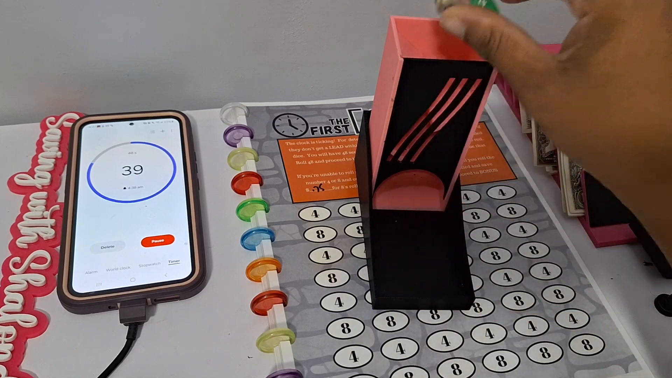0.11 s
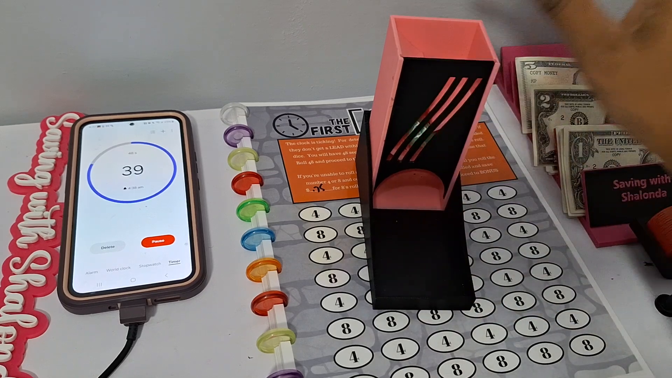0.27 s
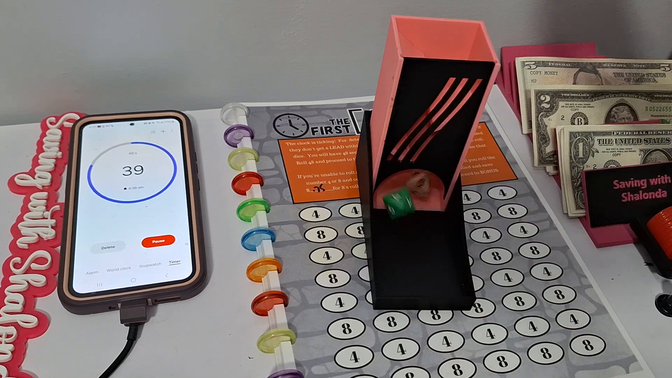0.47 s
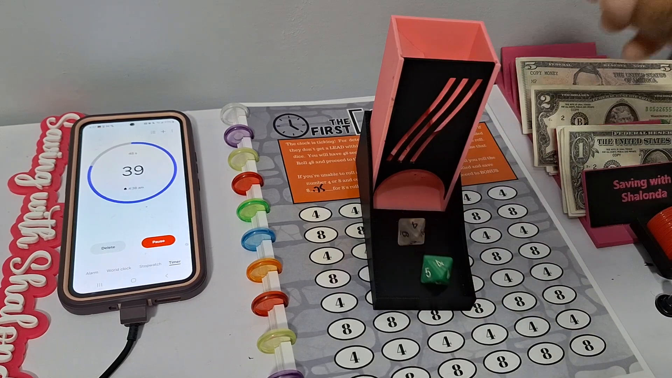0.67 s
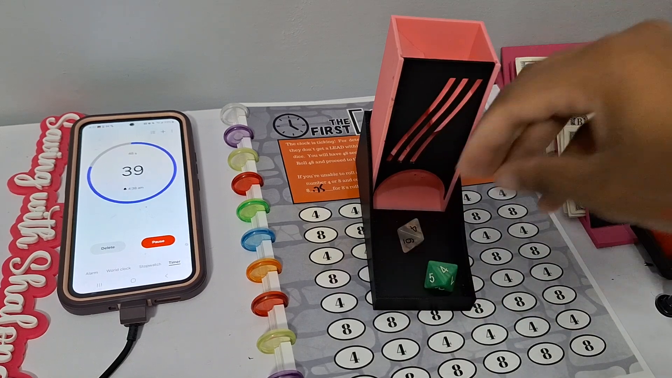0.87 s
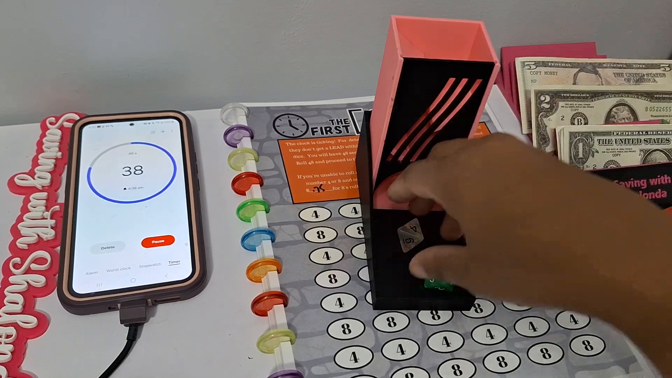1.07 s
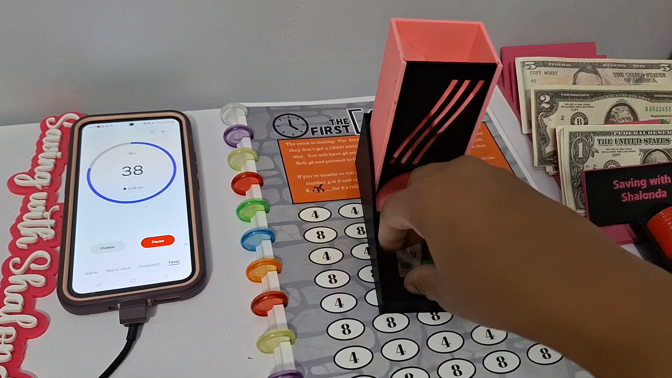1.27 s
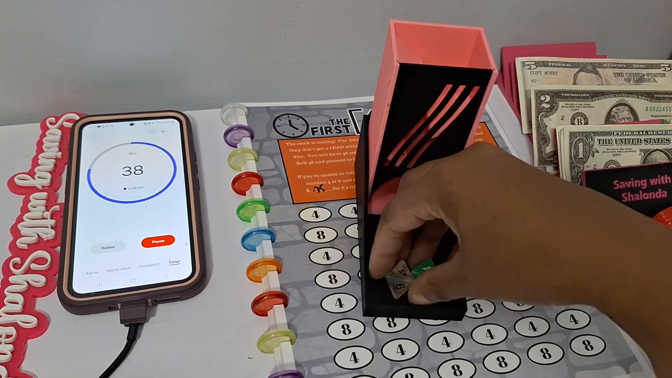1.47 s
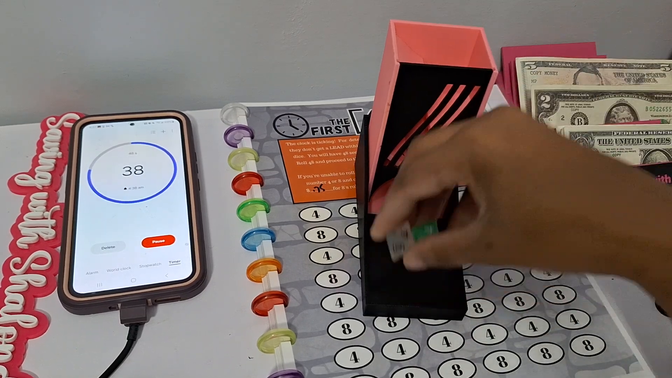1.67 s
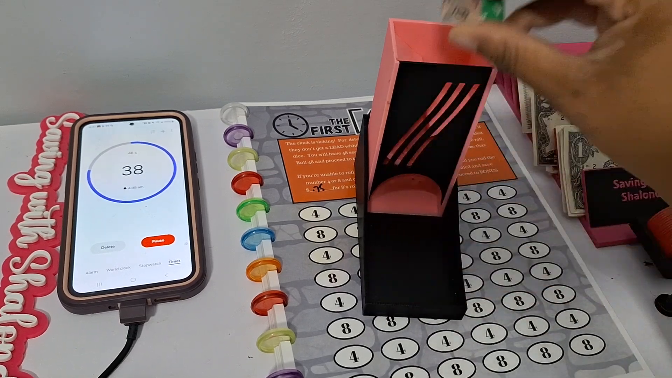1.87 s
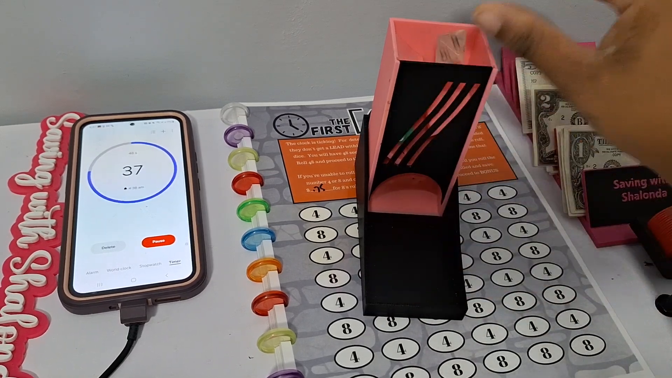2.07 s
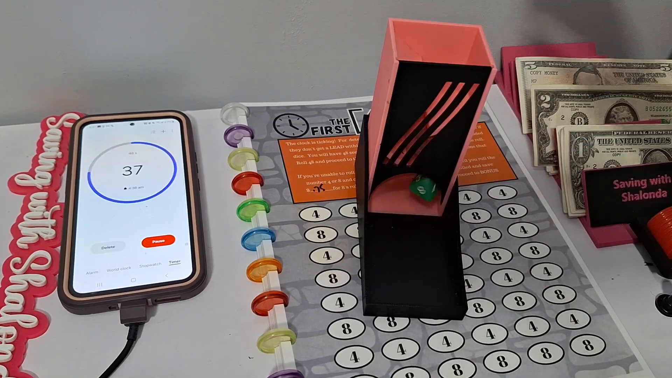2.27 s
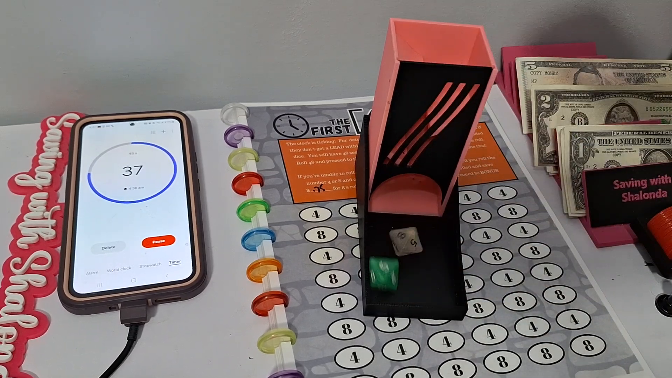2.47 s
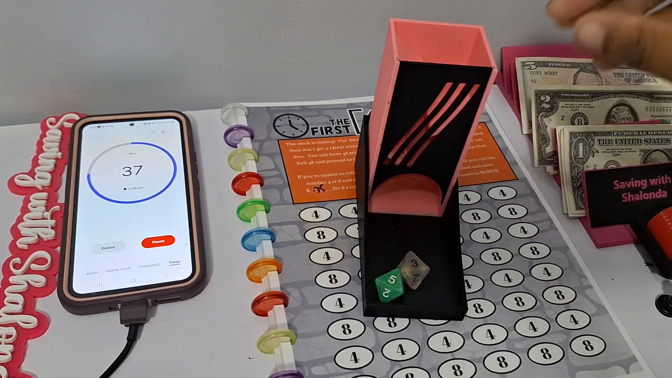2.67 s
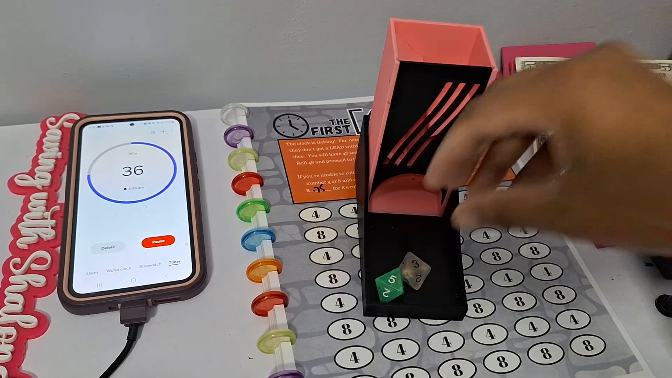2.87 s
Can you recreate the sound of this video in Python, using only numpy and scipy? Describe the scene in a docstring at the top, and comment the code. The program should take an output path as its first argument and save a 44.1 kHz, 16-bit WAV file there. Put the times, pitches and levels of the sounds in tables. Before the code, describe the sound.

Hard plastic dice rattle through a hollow tower and settle in a tray, then again, close up

```python
"""Dice tower on a table

Two plastic dice drop twice through a small plastic tower in a small room, heard from close by in stereo.
They knock down its baffles (noise cracks, shell modes and brief wall rings), then click in the tray.
Sparse grains make the slides; between rolls a hand gathers the dice, rubs and bumps the tower's rim.
A diffuse tail gives the room; mains hum and soft noise lie beneath."""
import sys
import numpy as np
from scipy import signal
from scipy.fft import rfft, irfft, next_fast_len
from scipy.io import wavfile

SR = 44100
rng = np.random.default_rng(int(sys.argv[2]) if len(sys.argv) > 2 else 0)


def store_pcm(level_fs):
    """Save levels as 16-bit WAV."""
    pcm = np.round(np.clip(level_fs, -1, 1) * 32767).astype(np.int16)
    wavfile.write(sys.argv[1], SR, np.atleast_2d(pcm).T)


N = 130095  # samples, 2.95 s
HIT_SAMPLES = 8192
AGE = np.arange(HIT_SAMPLES) / SR  # seconds since a blow
BODY_EDGE_HZ, SNAP_EDGE_HZ = 2050, 6660  # body lies below, snap above, the middle between
WIDTH, SNAP_WIDTH = 0.5, 0.9  # stereo spread: 0 is mono


def from_db(db):
    """Decibels to gain."""
    return 10 ** (np.asarray(db) / 20)


def at_hz(points, hz, axis=1):
    """Read a column of a table on a log-frequency axis."""
    table = np.array(points, float)
    return np.interp(np.log(hz + 1), np.log(table[:, 0]), table[:, axis])


def colour(x, points):
    """Causal (minimum-phase) filter with the given spectrum, made by folding its cepstrum."""
    n = 2 * next_fast_len(x.shape[-1])
    gain = from_db(at_hz(points, np.fft.rfftfreq(n, 1 / SR)))
    cepstrum = irfft(np.log(gain))
    cepstrum[1:n // 2] *= 2
    cepstrum[n // 2 + 1:] = 0
    response = np.exp(rfft(cepstrum))
    return irfft(rfft(x, n) * response)[..., :x.shape[-1]]


def stereo_noise(count, width):
    """Left and right noise, partly shared."""
    mid, side = rng.standard_normal((2, count))
    return np.array([mid + width * side, mid - width * side]) / np.sqrt(1 + width ** 2)


def add(out, s, sound):
    """Mix a sound in at a time in seconds."""
    i = int(s * SR)
    out[:, i:i + sound.shape[-1]] += sound[:, :N - i]


# A die strikes inside the tower. Each row: start in seconds, level in dB, body in dB re level,
# snap in dB re level, pitch of the struck wall in Hz, its ring in dB re the crack's middle before trims.
TOWER_HITS = [(0.218, -17.5, -4, -2, 4170, -6.5), (0.2294, -12, -15.5, -11, 4310, -0.5),
              (0.235, -18, -1, -12, 1550, -4), (0.248, -12, -12.5, -14.5, 2800, -9),
              (0.266, -11.5, -20, -11, 2660, 7.5), (0.27, -8.5, -18, -21, 2672, 4),
              (0.291, -21, -12, -13, 4480, -3), (0.312, -15.5, -2, -9, 1826, -5.5),
              (0.3465, -15.5, -4, -3, 3640, -3), (0.3538, -12.5, -7.5, -14, 1840, -6.5),
              (0.3848, -12, -31, -13.5, 3115, -5.5), (0.409, -20, -1, -8.5, 2214, -4),
              (0.4432, -14, -11, -10, 3127, -1.5), (0.467, -20.5, -9.5, 0.5, 3034, 5.5),
              (0.4721, -13, -17.5, -13.5, 3127, -7), (2.077, -12.5, -9.5, -11, 4223, -3.5),
              (2.0836, -14.5, -19.5, -10.5, 3680, -6.5), (2.088, -14.5, -14, -15, 3655, -2),
              (2.151, -10, -9.5, -20.5, 3670, -11), (2.159, -17, -3, -7.5, 2810, -2),
              (2.181, -13, -13.5, -15, 4770, -3.5), (2.188, -16.5, -2.5, -10.5, 3000, 9),
              (2.2193, -13.5, -5.5, -15.5, 4350, -8), (2.2275, -16, -5.5, -11.5, 4360, -23.5),
              (2.249, -15.5, -3.5, -13.5, 1610, -10), (2.2753, -9.5, -15, -18.5, 2690, 1),
              (2.303, -16.5, -4, -9, 4380, 3), (2.307, -18.5, -7.5, -11.5, 3680, 2),
              (2.333, -14, -19, -10, 2780, -10), (2.351, -28.5, 5, 1, 2700, -16.5),
              (2.366, -19, -1, -10.5, 2120, -11), (2.3987, -13.5, -14, -11, 5090, -2.5)]
# Resonances of the tower's shell. Each row: frequency in Hz, level in dB.
TOWER_MODES = [(619, -11.5), (855, -13), (1000, -9), (1135, -14), (1567, -5.5), (1730, -6.5), (1815, -8),
               (2160, -18), (3110, -15), (4290, -12)]
# Common colour of a contact in the tower. Each row: frequency in Hz, gain in dB.
TOWER_COLOUR = [(480, -26), (700, -9.5), (1100, -3), (2400, -7), (2750, 2), (3700, -1.5), (3970, -5.5),
                (4300, 3.5), (5800, -5), (7500, -7.5), (8600, -15.5), (10000, -15.5), (16000, -23.5)]
TOWER_DETUNE = 0.004  # share by which modes shift with the place struck


def tower(crack_db, body_gain_db, snap_gain_db, wall_db, wall_t60, table_db):
    """The knocks (a crack, the whole shell, a thud in the table) and, apart, the brief wall rings."""
    knocks, walls = np.zeros((2, 2, N))
    for s, db, body, snap, wall_hz, ring_db in TOWER_HITS:
        # crack and wall split the energy of the middle band
        wall_share = 1 / (1 + from_db(-2 * ring_db))
        middle_db = db + crack_db + 10 * np.log10(1 - wall_share)
        levels = [db + body + body_gain_db, middle_db, db + snap + snap_gain_db]
        wall_gain = from_db(db + wall_db) * np.sqrt(wall_share)
        add(walls, s, wall_gain * ring(wall_hz, wall_t60, WIDTH))
        add(knocks, s, crack(TOWER_COLOUR, levels, hold_s=0.0028, t60=0.021))
        add(knocks, s, shell(TOWER_MODES, db + body, middle_db, WIDTH, TOWER_DETUNE))
        add(knocks, s, thud(db + body + table_db, 0, TOWER_DETUNE))
    return knocks, walls


# A die lands, tips over or is picked up in the tray.
# Each row: start in seconds, level in dB, body in dB re level.
TRAY_HITS = [(0.5175, -29.5, -1.5), (0.5399, -21.5, -10), (0.545, -20.5, -7), (0.5924, -23, -5),
             (0.615, -24, -6), (0.6226, -22, -9), (0.6317, -27, -7), (0.6706, -25.5, -6.5),
             (0.714, -33.5, -5), (1.268, -53, -3), (1.274, -49.5, 2), (1.301, -40.5, -6.5),
             (1.339, -41.5, -8), (1.3444, -42, -5.5), (1.453, -54.5, -3), (1.465, -55, -9),
             (2.418, -17, -9.5), (2.435, -24.5, -4.5), (2.4452, -23, -9.5), (2.4936, -24, -14.5),
             (2.516, -24.5, -9), (2.541, -14, -7), (2.549, -26, -8), (2.592, -28.5, -5),
             (2.6069, -19, -9.5), (2.64, -28, -9), (2.6512, -25, -9.5), (2.6792, -22.5, -14),
             (2.704, -33, -14)]
# Resonances of the tray. Each row: frequency in Hz, level in dB.
TRAY_MODES = [(600, -18.5), (1140, -8.5), (1270, -10.5), (1520, -8.5), (2420, -9.5), (3070, -13.5)]
# Common colour of contacts and slides. Each row: frequency in Hz, gain in dB.
TRAY_COLOUR = [(480, -17.5), (900, -13), (1150, 1.5), (1900, -6.5), (2500, 1.5), (4800, -3), (6000, -11),
               (7400, -7), (8500, -18.5), (16000, -27.5)]
TRAY_DETUNE = 0.022  # share by which modes shift with the place where a die lands


def tray(crack_db, body_gain_db, snap_db, table_db, lowest_db):
    """Shorter, drier clicks on the tray floor: a crack, the tray's modes and a thud in the table."""
    out = np.zeros((2, N))
    for s, db, body in TRAY_HITS:
        levels = [db + body + body_gain_db, db + crack_db, db + snap_db]
        add(out, s, crack(TRAY_COLOUR, levels, hold_s=0.00094, t60=0.021))
        add(out, s, shell(TRAY_MODES, db + body, db, WIDTH, TRAY_DETUNE))
        add(out, s, thud(db + body + table_db, lowest_db, TRAY_DETUNE))
    return out


CONTACT_S = 0.0069  # a crack's energy is that of its level held for this time


def crack(points, levels_db, hold_s, t60):
    """The dense, quickly dying modes of a hard plastic contact, as body, middle and snap."""
    attack = 1 - np.exp(-AGE / 0.00018)
    envelope = attack * from_db(-60 * np.maximum(AGE - hold_s, 0) / t60)
    points = struck_colour(points)
    bands = [(BODY_EDGE_HZ, "low"), ([BODY_EDGE_HZ, SNAP_EDGE_HZ], "band"), (SNAP_EDGE_HZ, "high")]
    out = 0
    for (edge, kind), db in zip(bands, levels_db):
        width = SNAP_WIDTH if kind == "high" else WIDTH
        burst = colour(stereo_noise(HIT_SAMPLES, width) * envelope, points)
        part = signal.sosfilt(signal.butter(4, edge, kind, fs=SR, output="sos"), burst)
        rms = np.sqrt(np.sum(part ** 2) / (2 * CONTACT_S * SR))
        out = out + from_db(db) * part / rms
    return out


CRACK_PATCHES, CRACK_SPREAD_DB = 44, 4  # points along the spectrum, random spread of each


def struck_colour(points):
    """Each blow meets another spot and so lifts its own broad resonances out of the common colour."""
    hz = np.geomspace(points[0][0], points[-1][0], CRACK_PATCHES)
    lift_db = CRACK_SPREAD_DB * rng.standard_normal(CRACK_PATCHES)
    return np.column_stack([hz, at_hz(points, hz) + lift_db])


LOW_T60_S, T60_FALL = 0.2, 0.21  # decay time at 100 Hz, power by which it falls with frequency
MODE_SPREAD_DB = 5.5


def shell(modes, body_db, level_db, width, detune):
    """Each blow shares its energy among slightly shifted modes; low ones follow the body of the blow."""
    shares = from_db(MODE_SPREAD_DB * rng.standard_normal(len(modes)))
    shares = shares / np.sqrt(np.mean(shares ** 2))
    out = 0
    for (hz, db), share in zip(modes, shares):
        strength = share * from_db(db + (body_db if hz < BODY_EDGE_HZ else level_db))
        t60 = LOW_T60_S * (hz / 100) ** -T60_FALL
        out = out + strength * ring(hz * (1 + detune * rng.normal()), t60, width)
    return out


# The table top under tower and tray; the bump plays its first row too.
# Each row: frequency in Hz, level in dB.
TABLE_MODES = [(130, -21.5), (195, -30), (240, -29)]


def thud(level_db, lowest_db, detune):
    """The table top answers a blow in a few low modes; the lowest has its own trim."""
    out = 0
    for k, (hz, db) in enumerate(TABLE_MODES):
        gain = from_db(level_db + db + (lowest_db if k == 0 else 0))
        out = out + gain * ring(hz * (1 + detune * rng.normal()), LOW_T60_S, 0)
    return out


def ring(hz, t60, width):
    """One decaying mode, reaching the two microphones with different phases unless width is 0."""
    phase = rng.uniform(0, 2 * np.pi) + width * rng.normal() * np.array([[1], [-1]])
    onset = (1 - np.exp(-2 * AGE * hz)) ** 2
    return np.sin(2 * np.pi * hz * AGE + phase) * from_db(-60 * AGE / t60) * onset


# Dice slide and roll.
# Each row: start in seconds, length in seconds, level in dB, body in dB re level.
SCRAPES = [(.222, .25, -28.5, 1), (.478, 0.063, -31, -1), (.55, 0.17, -43.5, 3.5), (2.092, .064, -25.5, -1),
           (2.16, 0.32, -32.5, 0.5), (2.48, 0.24, -37.5, -3)]


def scrapes():
    """Dice slide and roll in sparse plastic grains."""
    return friction(SCRAPES, TRAY_COLOUR, grains_per_s=1300, fade_s=0.008)


# Fingers rub on the dice and the tower.
# Each row: start in seconds, length in seconds, level in dB, body in dB re level.
RUBS = [(1.165, 0.14, -62, 3), (1.335, 0.066, -54.5, 6.5), (1.755, 0.059, -55, -5)]
# Dull colour of skin, also of the pat on the rim. Each row: frequency in Hz, gain in dB.
RUB_COLOUR = [(80, -1.5), (220, 3), (480, -14), (1050, -4.5), (5000, -16), (14000, -36)]


def rubs():
    """Skin makes a fine rustle that swells and fades."""
    return friction(RUBS, RUB_COLOUR, grains_per_s=5000, fade_s=0.034)


def friction(strokes, points, grains_per_s, fade_s):
    """Runs of tiny contacts as surfaces slide or roll; each stroke has its own weight of body."""
    t = np.arange(N) / SR
    clicks = (rng.random(N) < grains_per_s / SR) * from_db(rng.exponential(1, N))
    decay = np.exp(-1 / (0.0006 * SR))  # each grain dies with a 0.6 ms time constant
    envelope = signal.lfilter([1], [1, -decay], clicks)
    grains = colour(stereo_noise(N, WIDTH) * envelope, points)
    body = signal.sosfiltfilt(signal.butter(2, BODY_EDGE_HZ, fs=SR, output="sos"), grains)
    out = 0
    for s, length, db, body_db in strokes:
        fade = np.clip(np.minimum(t - s, s + length - t) / fade_s, 0, 1)
        out = out + from_db(db) * fade * (grains - body + from_db(body_db) * body)
    return out / grains.std()


BUMP_S, BUMP_DB, PAT_DB = 1.812, -37.5, -28.5  # time in seconds, table and pat gains in dB


def bump(pat_t60, thud_t60, rise_s):
    """The hand softly meets the rim: a dull pat swells, and the table's lowest mode answers."""
    out = np.zeros((2, N))
    pat = colour(stereo_noise(HIT_SAMPLES, WIDTH) * from_db(-60 * AGE / pat_t60), RUB_COLOUR)
    answer = ring(TABLE_MODES[0][0], thud_t60, 0)
    swell = 1 - np.exp(-AGE / rise_s)
    add(out, BUMP_S, swell * (from_db(BUMP_DB) * answer + from_db(PAT_DB) * pat))
    return out


# The small room's tail. Each row: frequency in Hz, level in dB, 60 dB decay time in seconds.
ROOM = [(129.8, -13.5, .25), (495.5, -6, 0.29), (1320, -4, .27), (3000, -3, 0.25), (6000, -9, 0.31),
        (13000, -7, .21)]
ROOM_DELAY_S, ROOM_BUILD_S = 0.0032, 0.006


def room(x):
    """A short diffuse tail of noise in octave bands, each with its own level and decay."""
    t = np.arange(SR // 2) / SR
    hz = np.fft.rfftfreq(len(t), 1 / SR)
    noise = rfft(stereo_noise(len(t), width=0.75))
    build = np.clip((t - ROOM_DELAY_S) / ROOM_BUILD_S, 0, 1)
    response = 0
    for centre in 62.5 * 2 ** np.arange(9):
        inside = (hz >= centre / np.sqrt(2)) & (hz < centre * np.sqrt(2))
        band = irfft(noise * inside, len(t))
        envelope = from_db(-60 * t / at_hz(ROOM, centre, axis=2)) * build
        gain = from_db(at_hz(ROOM, centre)) / np.sqrt(np.sum(envelope ** 2))
        response = response + gain * band * envelope
    return signal.fftconvolve(x, response, axes=1)[:, :N]


# Low room noise at the microphones. Each row: frequency in Hz, gain in dB.
FLOOR = [(25, -80), (55, -52.5), (85, -52.5), (260, -64), (450, -82.5), (3600, -79.5), (16000, -100)]
HUM_HZ, HUM_DB = 59.6, -63  # RMS level before the final bass cut


def background():
    """Faint mains hum as one sine, and low room noise."""
    hum = np.sqrt(2) * from_db(HUM_DB) * np.sin(2 * np.pi * HUM_HZ * np.arange(N) / SR)
    return hum + colour(stereo_noise(N, width=0.4), FLOOR)


# Tilt of the left microphone; the right gets the opposite. Each row: frequency in Hz, gain in dB.
PAN_DB = [(2000, 0.35), (10000, -1.4)]


def scene():
    """Dice, hand and room from close by; the ringing walls sound mostly straight at the microphone."""
    knocks, walls = tower(crack_db=-1.0, body_gain_db=-2, snap_gain_db=1.5,
                          wall_db=7.5, wall_t60=0.045, table_db=2)
    clicks = tray(crack_db=-1.77, body_gain_db=0.5, snap_db=-11.0, table_db=7.5, lowest_db=-5.5)
    hand = rubs() + bump(pat_t60=0.08, thud_t60=0.16, rise_s=0.0025)
    direct = knocks + clicks + scrapes() + hand
    left, right = direct + walls + room(direct + from_db(-7) * walls)
    opposite = [(hz, -db) for hz, db in PAN_DB]
    return np.array([colour(left, PAN_DB), colour(right, opposite)]) + background()


def record(dry):
    """The deepest bass is cut, the highest peaks are rounded, then the top is cut."""
    thinned = signal.sosfilt(signal.butter(4, 48, "high", fs=SR, output="sos"), dry)
    rounded = thinned / (1 + (thinned / 0.9) ** 6) ** (1 / 6)
    # 60 dB down from 16.6 kHz
    return signal.sosfilt(signal.cheby2(16, 60, 16600, fs=SR, output="sos"), rounded)


dry = scene()
out = record(dry)
store_pcm(out)
```